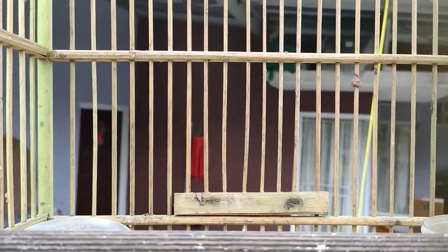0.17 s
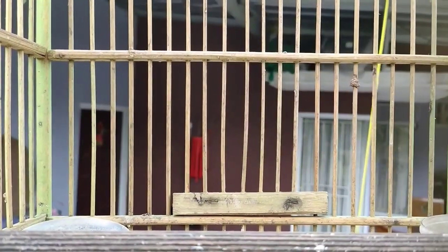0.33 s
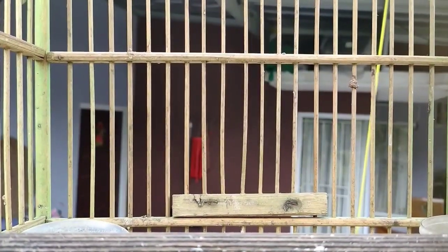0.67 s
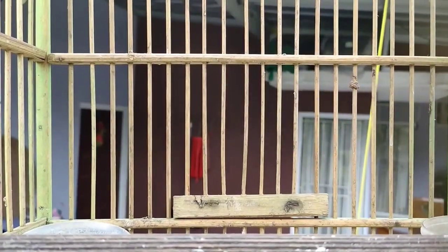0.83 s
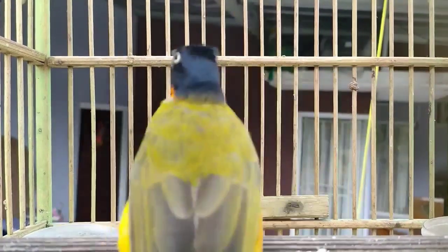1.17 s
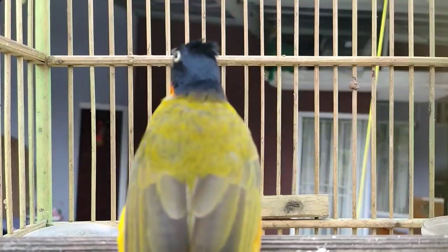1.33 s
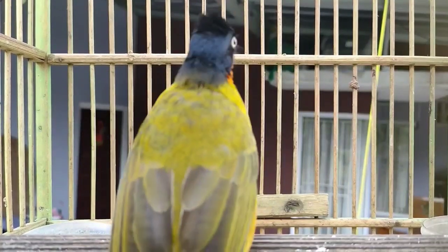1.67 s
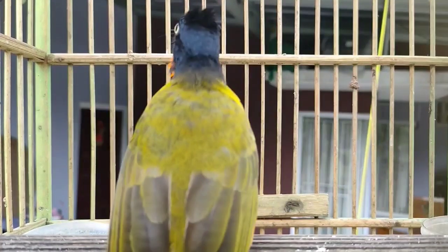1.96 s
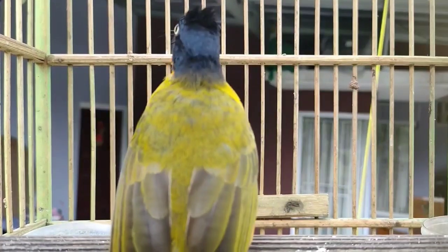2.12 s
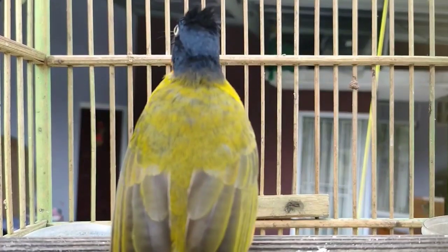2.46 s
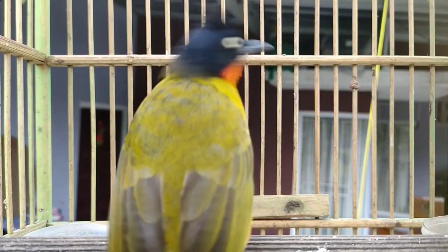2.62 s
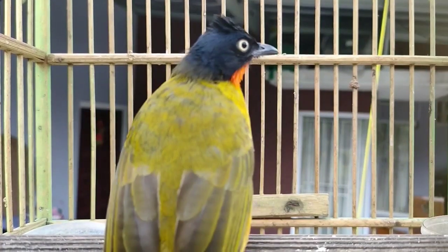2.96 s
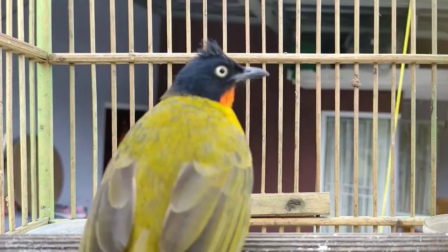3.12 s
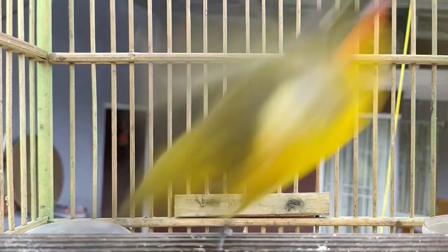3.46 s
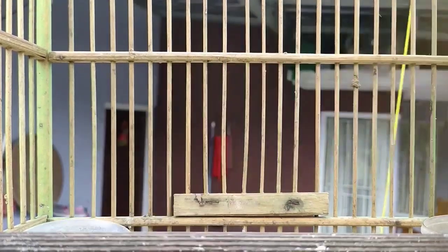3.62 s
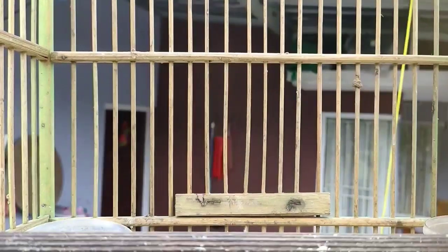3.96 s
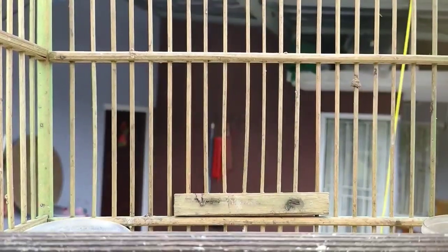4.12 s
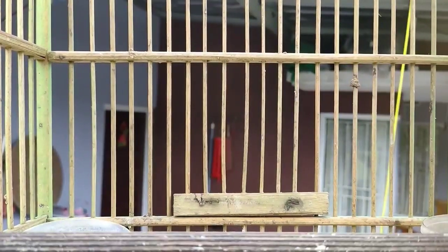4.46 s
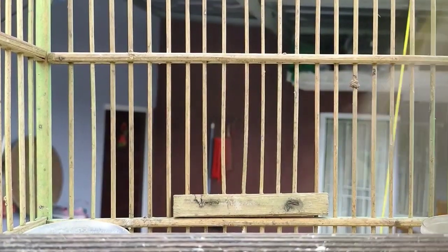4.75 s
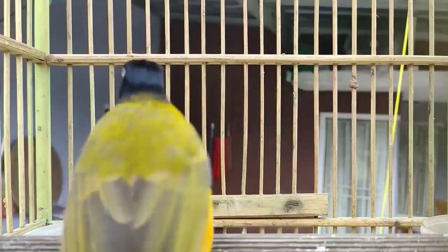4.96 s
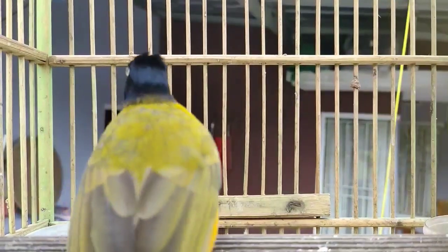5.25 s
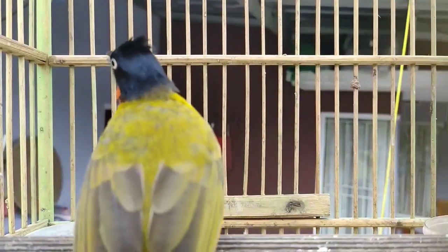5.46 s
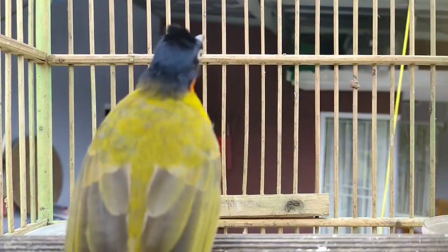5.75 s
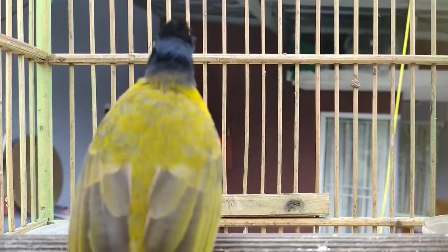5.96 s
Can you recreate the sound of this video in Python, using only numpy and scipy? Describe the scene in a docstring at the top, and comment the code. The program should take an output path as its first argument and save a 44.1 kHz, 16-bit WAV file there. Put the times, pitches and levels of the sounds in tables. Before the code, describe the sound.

Close stereo phone pickup of a caged songbird. Feather rustles, claw ticks and a light wooden rattle come first, and thin bars buzz faintly. Two short leaping whistles lead to a longer piercing one, loud enough to distort slightly. After a grainy swish and a lull, the bird flaps off and back with low air thumps, then pours out quick chirps. Faint low outdoor wash and short porch reflections surround it.

```python
"""A porch, with a bulbul in a bamboo cage a hand's width from a phone's two microphones.
The bird sings two leaping notes and a long whistle, and later a run of chirps: phase-driven sines with burr
and rasp, loud enough to clip. Before each song it flits about: noise bursts make the feather rustles, noise
rings resonances for claws, cage and bars, and slowing sines make the wing draughts on the right microphone.
A dry swish, faint patchy hums and a faint outdoor wash of coloured noise fill the rest."""
import sys
import numpy as np
from scipy import signal
from scipy.fft import rfft, irfft
from scipy.io import wavfile
from scipy.ndimage import map_coordinates

SR = 44100
rng = np.random.default_rng(int(sys.argv[2]) if len(sys.argv) > 2 else 0)


def waveform_to_disk(signal):
    """Save audio, clipped to [-1, 1], as 16-bit WAV at the path in sys.argv[1]."""
    frames = np.transpose(np.atleast_2d(signal))
    scaled = np.clip(frames, -1, 1) * 32767
    samples = np.round(scaled).astype(np.int16)
    wavfile.write(sys.argv[1], SR, samples)


N = 268480
T = np.arange(N) / SR  # time in seconds
HOOK_BREAK_HZ = 4540  # where the voice breaks to; also the reference pitch of the undertone


def undb(db):
    """Decibels to gain."""
    return 10 ** (np.asarray(db) / 20)


def unit(x):
    """Scale to an rms of one."""
    return x / np.sqrt(np.mean(x ** 2))


def pan(db):
    """Left and right gains; a positive value leans left by that many dB."""
    return undb(np.array([[db], [-db]]) / 2)


def curves(rows):
    """Each column of a table joined by straight lines in time."""
    s, *columns = np.transpose(rows)
    return [np.interp(T, s, c) for c in columns]


def delay(x, ms):
    """The sound, arriving later."""
    return np.interp(T - ms / 1000, T, x, left=0)


def walk(rate_hz):
    """Smooth random wander with an rms of one, through rate_hz random points a second."""
    knots = rng.standard_normal(N)
    return unit(map_coordinates(knots, [T * rate_hz], order=3, mode="mirror"))


def noise(side_db):
    """Stereo noise; the side share sets its width."""
    mid, side = rng.standard_normal((2, N))
    return mid + undb(side_db) * side * np.array([[1], [-1]])


def colour(x, points):
    """Shape a sound with a (Hz, dB) spectrum, nearly silent beyond its ends."""
    hz, db = np.transpose(points)
    f = np.maximum(np.fft.rfftfreq(N, 1 / SR), 1)
    gain_db = np.interp(np.log(f), np.log(hz), db, left=-90, right=-90)
    return irfft(rfft(x) * undb(gain_db), N)


def lowpass(x, hz):
    """Dull a sound above a corner frequency."""
    return signal.sosfilt(signal.butter(2, hz, fs=SR, output="sos"), x)


def ring(x, modes):
    """Drive a body with (Hz, width Hz, dB) resonances in parallel."""
    out = 0
    for hz, width, db in modes:
        b, a = signal.iirpeak(min(hz, .45 * SR), hz / width, SR)
        out = out + undb(db) * signal.lfilter(b, a, x)
    return out


def patchy(x, depth_db, rate_hz, spacing_hz):
    """Let narrow bands of a sound swell and fade, each on its own."""
    f, s, z = signal.stft(x, SR, nperseg=4096)
    places = np.meshgrid(f / spacing_hz, s * rate_hz, indexing="ij")
    chance = map_coordinates(rng.standard_normal((512, 256)), places, order=3, mode="mirror")
    return signal.istft(z * undb(depth_db * np.tanh(chance)), SR)[1][..., :N]


def swell(s, db, rise, fade):
    """Gain that climbs to its peak at s, lingers, then falls ever faster."""
    climb = np.minimum(T - s, 0) / abs(rise)
    fall = (np.maximum(T - s, 0) / fade) ** 2
    return undb(db) * np.exp(climb - fall)


def burst(s, decay_s):
    """Gain that jumps to one at s and dies away exponentially."""
    return (T >= s) * np.exp(-np.abs(T - s) / decay_s)


def leap(age, glide_s):
    """A smooth step from 0 to 1 around age zero."""
    return .5 + .5 * np.tanh(age / glide_s)


def bulbul(waver=0.0008, slip=0.68):
    """A nearly pure whistle; the syrinx adds rasp and an unsteady undertone at half the pitch."""
    half_db, half_db_per_octave = -1, 8
    upper_half_db, second_db, top_half_db = -10, -9, -22
    overtone_db, strain_db = -48, -14
    air_db, rasp_air_db = -50, -11
    # The cage favours some pitches and cancels others, differently at each microphone.
    # Each row: pitch in Hz, left level in dB, right level in dB.
    song_ports = [(1650, -1, 0.5), (2150, -3.5, 3.5), (2700, -3, 4), (2760, -11.5, 2), (2960, 0, 0),
                  (3080, 1.5, -2.5), (3207, 1, 0.5), (3306, -4.5, 4), (3600, 0.5, 5), (3740, 0.5, 0.5),
                  (4100, 3.5, -3.5), (4370, -6, -2.5), (4860, 2, 2)]
    # Breath hiss of the open beak. Each row: frequency in Hz, relative level in dB.
    beak_hiss = [(800, -11.5), (1800, 4.5), (3000, 0), (5500, -6.5), (8000, 1.5), (9500, -13), (16000, -25)]

    force, *weighted = upsweeps() + slurs() + arches() + hooks()
    # notes that touch blend into each other
    hz, left_lag_ms, lean_db, burr_db, rasp_db = np.array(weighted) / (force + 1e-12)
    hz = hz * (1 + waver * walk(300))

    # the small beak radiates the undertone better as the pitch climbs
    undertone = undb(half_db + half_db_per_octave * np.log2((hz + 1) / HOOK_BREAK_HZ))
    # rasp shakes both the timing and the size of the swings, and strains them into overtones
    phase = 2 * np.pi * np.cumsum(hz) / SR + undb(rasp_db) * walk(2400)
    shaken = force * (1 + undb(rasp_db) * walk(2400))
    overtones = undb(overtone_db) + undb(strain_db + rasp_db)
    stumble = slip * walk(500)

    port_hz, left_db, right_db = np.transpose(song_ports)
    left = (left_lag_ms, np.interp(hz, port_hz, left_db) + lean_db / 2)
    right = (0, np.interp(hz, port_hz, right_db) - lean_db / 2)
    ports = []
    for lag_ms, side_db in (left, right):
        p = phase - 2 * np.pi * hz * lag_ms / 1000
        # unequal swings bring in the half-pitch series
        half = p / 2 + stumble
        burr = undertone * np.sin(half)
        burr = burr + undb(upper_half_db) * np.sin(p + half)
        burr = burr + undb(second_db) * np.sin(2 * p + stumble)
        burr = burr + undb(top_half_db) * np.sin(2 * p + half)
        strain = np.sin(2 * p + 2 * stumble) + np.sin(4 * p + 4 * stumble) / 4
        voice = np.sin(p) + undb(burr_db) * burr + overtones * strain
        ports.append(shaken * undb(side_db) * voice)

    # a faint hiss rides on every note and grows with the rasp
    breath = undb(air_db) * np.sqrt(force) + undb(rasp_air_db + rasp_db) * force
    return np.array(ports) + breath * unit(colour(noise(0), beak_hiss))


def upsweeps(glide_s=.0058, attack_s=.024, release_s=.019):
    """A soft, hoarse start holds for a moment, then leaps with a brief accent to a sagging top note."""
    low_hz, scoop_hz, scoop_s, sag_hz_per_s = 2080, 700, .002, 7800
    low_db, low_burr_db, low_rasp_db = -3, -26, -21
    accent_db, accent_after_s, accent_s = 4, .002, .004
    # Each row: start in s, length in s, level in dB, left microphone delay in ms, lean to the left in dB,
    # burr in dB and rasp in dB after the leap, pitch at the leap's top in Hz, leap after s.
    leaping_notes = [(1.612, .059, -4.5, .11, 1, -29.5, -40, 3760, .0208),
                     (1.867, .065, -2, 0.16, 0, -25, -38.5, 3957, .0222)]
    out = 0
    for s, length, db, lag_ms, lean_db, burr_db, rasp_db, top_hz, leap_s in leaping_notes:
        age = T - s - leap_s
        up = leap(age, glide_s)
        start_hz = low_hz - scoop_hz * np.exp(-np.abs(T - s) / scoop_s)
        hz = (1 - up) * start_hz + up * (top_hz - sag_hz_per_s * age)
        accent = (1 - up) * low_db + accent_db * np.exp(-((age - accent_after_s) / accent_s) ** 2)
        burr = (1 - up) * low_burr_db + up * burr_db
        rasp = (1 - up) * low_rasp_db + up * rasp_db
        out = out + note(s, length, db + accent, lag_ms, lean_db, burr, rasp, hz, attack_s, release_s)
    return out


def slurs(attack_share=.19, release_s=0.015):
    """The pitch relaxes on to its last value with vibrato; a longer note opens and settles more slowly."""
    settle_s, settle_share = .013, .082
    vibrato_hz, depth_hz = 14.9, 22
    # The long whistle and the lead-in to the run. Each row: start in s, length in s, level in dB,
    # left microphone delay in ms, lean to the left in dB, burr in dB, rasp in dB,
    # first pitch and last pitch in Hz, both before vibrato.
    falling_notes = [(1.972, .185, 4.5, .14, -0.5, -47.5, -56, 3680, 3069),
                     (5.436, 0.039, -17.5, 0.062, 1.5, -37, -22.5, 3217, 1256)]
    out = 0
    for s, length, *voice, first_hz, last_hz in falling_notes:
        age = np.maximum(T - s, 0)
        settling = np.exp(-age / (settle_s + settle_share * length))
        vibrato = depth_hz * np.cos(2 * np.pi * vibrato_hz * age)
        hz = last_hz + (first_hz - last_hz) * settling + vibrato
        out = out + note(s, length, *voice, hz, attack_share * length, release_s)
    return out


def arches(attack_share=0.75, release_share=0.46):
    """Pitch and loudness rise from a hoarse start to a rounded crest; the pitch then falls and the note fades."""
    rise_power, fall_power = 1.3, 2.4
    hoarse_db, hoarse_share = 14, 0.35
    # Two loud chirps and two soft ones. Each row: start in s, length in s, level in dB,
    # left microphone delay in ms, lean to the left in dB, burr in dB and rasp in dB before the hoarse start
    # is added, first pitch, top pitch and last pitch in Hz, crest after s.
    arched_notes = [(5.466, 0.024, 0, 0.096, 5.5, -24, -29, 1110, 3400, 1528, 0.013),
                    (5.495, 0.024, 1, 0.098, 1.5, -26, -29, 998, 3290, 3000, 0.011),
                    (5.555, 0.061, -13, 0.03, -2.5, -21, -33, 3440, 4000, 3043, .035),
                    (5.775, 0.054, -12.5, 0.032, -4, -20.5, -21, 3543, 4140, 4020, 0.036)]
    out = 0
    for s, length, *voice, burr_db, rasp_db, first_hz, top_hz, last_hz, crest in arched_notes:
        age = T - s - crest
        below = (top_hz - first_hz) * np.abs(age / crest) ** rise_power
        beyond = (top_hz - last_hz) * np.abs(age / (length - crest)) ** fall_power
        hz = top_hz - np.where(age < 0, below, beyond)
        hoarse = hoarse_db * np.exp(-((T - s) / (hoarse_share * length)) ** 2)
        attack_s, release_s = attack_share * length, release_share * length
        out = out + note(s, length, *voice, burr_db + hoarse, rasp_db + hoarse, hz, attack_s, release_s)
    return out


def hooks(dip_s=0.043, break_s=.048, glide_s=0.0034, attack_s=0.015, release_s=0.027):
    """A clean dip, then a catch as the voice breaks to a climbing, rasping register with an undertone."""
    climb_hz_per_s, upper_db, catch_db, high_lag_ms = 23000, -2, -4, 0.062
    low_burr_db, high_burr_db = -54, -18
    low_rasp_db, high_rasp_db = -35, -17
    # Each row: start in s, length in s, level in dB, then for the low register left microphone delay in ms
    # and lean to the left in dB, first pitch in Hz, dip pitch in Hz.
    breaking_notes = [(5.646, 0.083, 2.5, 0.093, 3.5, 3696, 3067), (5.868, 0.08, 2, 0.12, -2, 3508, 3228)]
    out = 0
    for s, length, db, lag_ms, lean_db, first_hz, dip_hz in breaking_notes:
        age = T - s
        up = leap(age - break_s, glide_s)
        catch = catch_db * np.exp(-((age - break_s) / glide_s) ** 2)
        low = dip_hz + (first_hz - dip_hz) * (1 - age / dip_s) ** 2
        high = HOOK_BREAK_HZ + climb_hz_per_s * (age - break_s)
        hz = (1 - up) * low + up * high
        lag = (1 - up) * lag_ms + up * high_lag_ms
        burr = (1 - up) * low_burr_db + up * high_burr_db
        rasp = (1 - up) * low_rasp_db + up * high_rasp_db
        level_db = db + up * upper_db + catch
        out = out + note(s, length, level_db, lag, (1 - up) * lean_db, burr, rasp, hz, attack_s, release_s)
    return out


def note(s, length, db, lag_ms, lean_db, burr_db, rasp_db, hz, attack_s, release_s):
    """The force of one note, then its pitch, delay, lean, burr and rasp weighted by that force."""
    opening = np.clip((T - s) / attack_s, 0, 1)
    closing = np.clip((s + length - T) / release_s, 0, 1)
    force = undb(db) * (np.sin(np.pi / 2 * opening) * np.sin(np.pi / 2 * closing)) ** 2
    return force * np.array(np.broadcast_arrays(1, hz, lag_ms, lean_db, burr_db, rasp_db))


def draughts(left_db=-30, slowing=0.22, wake_s=0.029):
    """Each wing stroke pushes a few slowing swings of air into the right port and leaves a wake of eddies."""
    # Each row: start in s, level in dB at the right, pitch in Hz halfway through, length in s,
    # turbulence in dB and wake in dB, both relative to the stroke.
    strokes = [(0, -11, 118, 0.058, -9.5, -37), (0.325, -11.5, 82.5, 0.043, -9.5, -11),
               (0.425, -26.5, 62, 0.061, -5.5, -18), (1.06, -31, 59, 0.043, -8, -7),
               (3.6612, 2.5, 114.3, 0.028, -17, -39), (3.678, -5.5, 58, 0.023, -10, -41),
               (3.71, -19, 96, 0.025, -22, -17), (4.952, -18, 63, 0.044, -20, -29),
               (4.979, 4, 177.3, 0.0228, -4, -29), (4.998, -0.5, 100.2, 0.03, -1, -26),
               (5.029, -13, 85, 0.037, -10, -33), (5.052, -4, 104, 0.019, -17, -27)]
    # Spectrum of the turbulent air. Each row: frequency in Hz, relative level in dB.
    eddy_colour = [(15, 1.5), (50, -5.5), (90, -1.5), (200, 0.5), (300, -6), (400, -7), (560, -16.5),
                   (1000, -28.5), (2500, -51.5)]
    eddies = unit(colour(noise(0), eddy_colour))
    out = np.zeros((2, N))
    for s, db, hz, length, eddy_db, wake_db in strokes:
        age = np.clip((T - s) / length, 0, 1)
        swing = np.sin(2 * np.pi * hz * length * age * (1 + slowing * (1 - age)))
        out += undb(db) * np.sin(np.pi * age) * (swing + undb(eddy_db) * eddies)
        out += swell(s + length, db + wake_db, length / 10, wake_s) * eddies
    return out * np.array([[undb(left_db)], [1]])


def flick(knock_db=-7, knock_s=0.016):
    """A wing tip's hard, bright snap and the short, dry knock of the phone's case, on the right only."""
    # One snap: start in s, level in dB, decay in s.
    snap = (4.983, -9, 0.0021)
    # Spectrum of the case. Each row: frequency in Hz, relative level in dB.
    case_knock = [(200, -8), (380, -4.5), (520, -2.5), (700, -5), (1050, -8.5), (2000, -17), (5000, -35)]
    snap_colour = [(300, 13), (2000, -12), (16000, -25)]  # (Hz, relative dB)
    s, db, decay_s = snap

    def strike(points, fade_s):
        """Coloured noise that starts at once and dies away."""
        return unit(colour(noise(0)[0], points)) * burst(s, fade_s)

    hit = undb(db) * strike(snap_colour, decay_s) + undb(knock_db) * strike(case_knock, knock_s)
    return np.array([0 * hit, hit])


def claws(contact_s=0.0031, gain_db=-6, pan_db=-6):
    """Claws on bamboo: short noise scratches ring the thin bars."""
    # Each row: start in s, level in dB relative to the other ticks.
    scratches = [(0.2178, -35), (.281, -18.5), (.316, -20), (0.3516, -8), (0.408, -21.5), (.433, -24),
                 (.465, -27.5), (0.7717, -30), (0.997, -16.5), (1.0066, -23), (1.1235, -22.5),
                 (3.5751, -45.5), (3.6305, -34.5), (3.661, -26), (3.699, -22.5), (3.7987, -35),
                 (3.8085, -30), (3.8175, -25.5), (4.411, -38.5), (4.533, -44), (4.9814, -23), (5.028, -23),
                 (5.035, -29), (5.198, -33)]
    # Resonances of the bars under a claw. Each row: frequency in Hz, width in Hz, relative level in dB.
    claw_modes = [(3600, 900, -11), (6460, 400, -2.5), (7580, 270, -4.5), (8450, 1000, 13.5),
                  (10000, 650, -2.5), (12400, 1700, -7), (15440, 210, -34)]
    push = sum(undb(db) * burst(s, contact_s) for s, db in scratches)
    steady_level = np.std(ring(noise(0), claw_modes))
    ticks = ring(push * noise(0), claw_modes) / steady_level
    return ticks * undb(gain_db) * pan(pan_db)


def jolts(side_db=-4):
    """Take-offs and landings: the perch chatters in its seat and rings the frame, each with its own brightness."""
    # Each row: start in s, level in dB, decay of the rattle in s, brightness (low-pass corner) in Hz.
    knocks = [(0.282, -23, 0.0197, 2500), (1.118, -29, 0.047, 360), (3.801, -36.5, 0.05, 1840),
              (4.411, -47.5, 0.034, 2000), (4.534, -50, 0.016, 1977), (5.029, -30.5, 0.014, 2500)]
    # Resonances of the cage frame. Each row: frequency in Hz, width in Hz, relative level in dB.
    cage_modes = [(250, 89, -20.5), (315, 140, -4), (513.2, 110, -7), (700, 29, -1), (915, 49, -3),
                  (1130, 110, -5), (1560, 78, -7), (2384, 600, -13), (2980, 190, -12.5), (4680, 430, -9)]
    frame = ring(noise(side_db), cage_modes)
    out = 0
    for s, db, decay_s, bright_hz in knocks:
        rattle = unit(lowpass(frame, bright_hz))
        out = out + rattle * undb(db) * burst(s, decay_s)
    return out


def feathers(flutter_db=2, grain_db=2.0, pan_db=-4):
    """Wing feathers brush each other in uneven strokes: flickering coloured noise in short flurries."""
    # Flurries of wingbeats. Each row: peak time in s, level in dB before panning, rise in s, fade in s.
    flurries = [(.31, -34, 0.026, 0.076), (.405, -38, 0.017, 0.075), (1.011, -44.5, .035, 0.13),
                (3.658, -39, 0.012, 0.075), (3.81, -43.5, 0.037, 0.081), (4.06, -54, 0.064, .12),
                (4.23, -56, 0.01, 0.071), (4.415, -49, 0.0039, 0.03), (4.96, -42.5, 0.025, 0.1),
                (5.19, -59, .06, .1)]
    # Spectrum of the rustle. Each row: frequency in Hz, relative level in dB.
    feather_colour = [(400, -4.5), (1500, -1.5), (3000, -4.5), (4500, -8), (6500, -1.5), (8700, -0.5),
                      (11000, -9.5), (15000, -10), (16500, -7)]
    brush = noise(-0.25) * undb(flutter_db * walk(60) + grain_db * walk(800))
    rustle = unit(patchy(colour(brush, feather_colour), 4, 8, 170))
    return rustle * sum(swell(*row) for row in flurries) * pan(pan_db)


def bars(side_db=2):
    """The thin bars buzz as the bird shifts: patchy noise passes twice through each resonance."""
    # Each row: peak time in s, level in dB, rise in s, fade in s.
    buzz = [(.54, -44, 0.112, .24), (1.05, -37.5, .018, .12), (1.33, -44, 0.08, .15)]
    # Resonances of the bars. Each row: frequency in Hz, half the width of each pass in Hz, relative level in dB.
    bar_modes = [(767, 25, 3), (1136, 32, 5), (1550, 60, -3.5), (1890, 26, -1), (2250, 260, -10),
                 (2770, 51, -18), (3055, 36, -8.5), (8500, 1100, -25.5)]
    shake = patchy(noise(side_db), 4.2, 3.7, 50)
    hum = 0
    for hz, half_width, db in bar_modes:
        once = ring(shake, [(hz, 2 * half_width, 0)])
        hum = hum + ring(once, [(hz, 2 * half_width, db)])
    return unit(hum) * sum(swell(*row) for row in buzz)


def swish(grain_db=1.5, side_db=0, treble_hz=3000, treble_fade_s=0.25):
    """A short, dry, grainy rush that rises at once and dies away, the treble a little faster."""
    peak_s = 3.061
    # Shape of the rush: level in dB, rise in s, fade in s.
    rush_shape = (-32, 0.0043, 0.19)
    # Spectrum of the rush. Each row: frequency in Hz, relative level in dB.
    rush_colour = [(59, -45), (100, -24), (381, 2), (442, -3), (662, 3.5), (721, -11), (784, 0.5),
                   (1100, -8.5), (1580, -9.5), (2370, -10.5), (3940, -19.5), (7940, -12.5), (14400, -31),
                   (16000, -52)]
    rush = unit(colour(noise(side_db) * undb(grain_db * walk(250)), rush_colour))
    body = signal.sosfiltfilt(signal.butter(2, treble_hz, fs=SR, output="sos"), rush)
    treble_gain = np.exp(-((T - peak_s) / treble_fade_s) ** 2)
    return (body + (rush - body) * treble_gain) * swell(peak_s, *rush_shape)


def drones(side_db=-6, patchy_db=5):
    """Faint patchy hums, narrow or broad, that swell and fade: noise passed twice through one resonance."""
    # Each row: start in s, length in s, pitch in Hz, filter width as a share of the pitch, level in dB.
    hums = [(1.444, 0.94, 590, 1, -50), (2.08, 0.65, 620, 1, -53.5), (2.72, 0.24, 720, .4, -59.5),
            (2.712, 0.19, 312.7, .14, -55), (3.429, 0.17, 227, .14, -54), (4.05, .34, 690, 0.34, -50),
            (4.38, 0.26, 211.8, .14, -50.5), (4.551, 0.65, 777, 0.13, -63), (5.33, .2, 650, 0.14, -52.5),
            (5.46, 0.19, 370, 0.27, -43.5), (5.682, 0.52, 381, 1, -54.5)]
    air = patchy(noise(side_db), patchy_db, 8.7, 45)
    out = 0
    for s, length, hz, width, db in hums:
        band = [(hz, width * hz, 0)]
        hum = unit(ring(ring(air, band), band))
        arc = np.sin(np.pi * np.clip((T - s) / length, 0, 1))
        out = out + hum * undb(db) * arc
    return out


def outdoors(throb_db=2, low_gain_db=2.5, high_gain_db=1.0, patchy_db=7):
    """A low rumble, nearly alike at both ports, under a wide distant wash whose tones come and go."""
    # Background levels. Each row: time in s, rumble in dB and murmur in dB, both before their gains.
    levels = [(0.0, -36, -50), (0.25, -49.5, -62), (0.49, -42.5, -50.5), (0.86, -52, -59),
              (1.03, -47.5, -85), (1.19, -44.5, -49), (1.32, -41.5, -55.5), (1.51, -49, -53.5),
              (2.02, -51.5, -47), (2.39, -46, -49.5), (2.58, -51, -61), (2.88, -64.5, -65.5),
              (3.1, -74, -89), (3.22, -49, -55), (3.37, -66, -76), (3.6, -72, -76), (3.68, -46, -67.5),
              (3.81, -40, -60), (4.21, -55.5, -54.5), (4.65, -70, -71.5), (4.9, -70.5, -70),
              (5.1, -39, -52.5), (5.46, -55.5, -58.5), (5.64, -56, -49.5), (6.09, -51.5, -55)]
    # Spectra of the two layers. Each row: frequency in Hz, relative level in dB.
    rumble_colour = [(15, -55), (25, -8), (82, -2.5), (147, 5), (200, 0.5), (321, -5.5), (354, -6),
                     (395, -12), (436, -13.5), (600, -24.5), (700, -14), (910, -43.5), (1540, -120)]
    murmur_colour = [(350, -6), (600, -3), (760, -3), (930, -5), (1150, -8.5), (1400, -9), (2000, -9.5),
                     (3000, -15.5), (4000, -29.5), (8500, -25.5), (16000, -46)]
    rumble_db, murmur_db = curves(levels)
    rumble = unit(patchy(colour(noise(-11), rumble_colour), 4, 6, 45))
    rumble = rumble * undb(low_gain_db + rumble_db + throb_db * walk(20))
    murmur = unit(patchy(colour(noise(1), murmur_colour), patchy_db, 6, 55))
    murmur = murmur * undb(high_gain_db + murmur_db + walk(25))
    return rumble + murmur


def porch(x, early_s=0.013, bright_hz=8500):
    """A few close reflections, a quick cluster from the roof and a duller tail that lingers faintly."""
    t60_s, late_t60_s, late_db = .53, 1.5, -35
    early_db, tail_db = 6, -20
    # Nearby walls and floor. Each row: delay in ms at the left (from the second on, increasingly later
    # at the right), level in dB.
    echoes = [(3.1, -24), (7.3, -23.5), (12.4, -25.5), (21, -22)]
    near = np.zeros((2, N))
    for c in (0, 1):
        for k, (ms, db) in enumerate(echoes):
            near[c] += undb(db) * delay(x[c], ms + c * k / 10)
    fade = np.exp(-np.log(1000) * T / t60_s)
    fade = fade + undb(late_db) * np.exp(-np.log(1000) * T / late_t60_s)
    fade = fade + undb(early_db) * np.exp(-T / early_s)
    tail = lowpass(rng.standard_normal((2, N)), bright_hz) * fade * (T > .006)
    # scaled so that the pass band has a power gain of about one
    tail = unit(tail) / np.sqrt(N) * np.sqrt(2 * bright_hz / SR)
    return x + near + undb(tail_db) * signal.fftconvolve(x, tail, axes=1)[:, :N]


def scene():
    """Song, claws, jolts and feathers sound into the porch; the other layers are added without its echo."""
    in_porch = porch(bulbul() + claws() + jolts() + feathers())
    return in_porch + bars() + draughts() + swish() + outdoors() + drones() + flick()


def record(dry):
    """The phone clips at full scale, adding odd overtones whose highest fold back down, then cuts the top."""
    top_hz = 16050
    clipped = np.clip(dry, -1, 1)
    return signal.sosfiltfilt(signal.ellip(8, .05, 60, top_hz, fs=SR, output="sos"), clipped)


dry = scene()
out = record(dry)
waveform_to_disk(out)
```